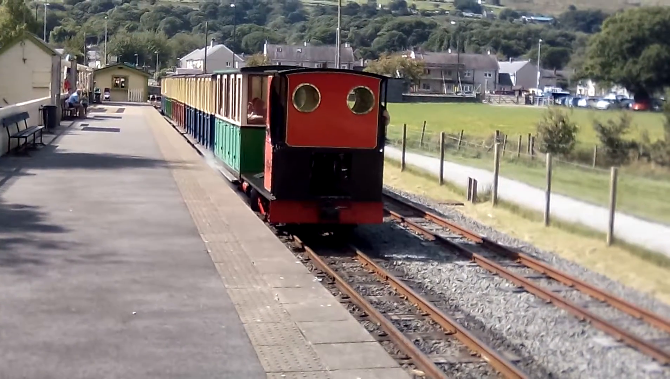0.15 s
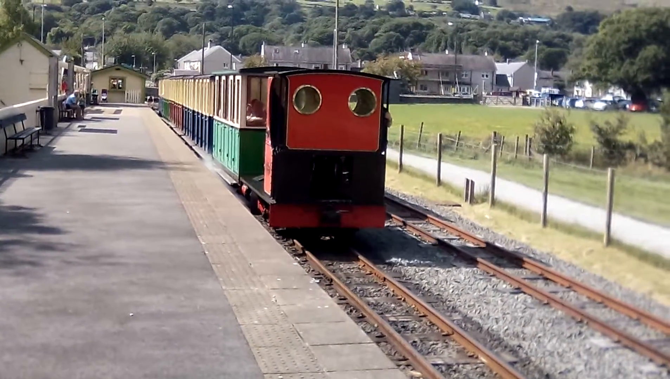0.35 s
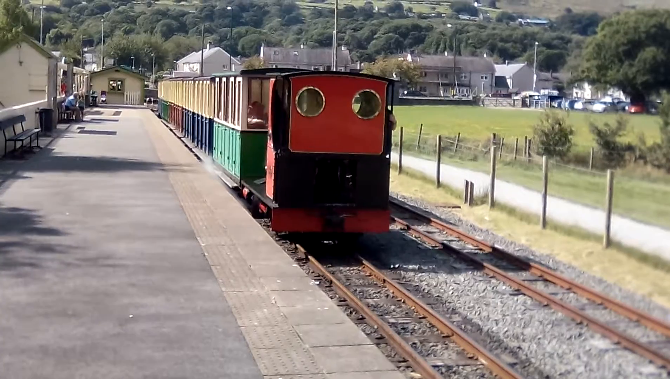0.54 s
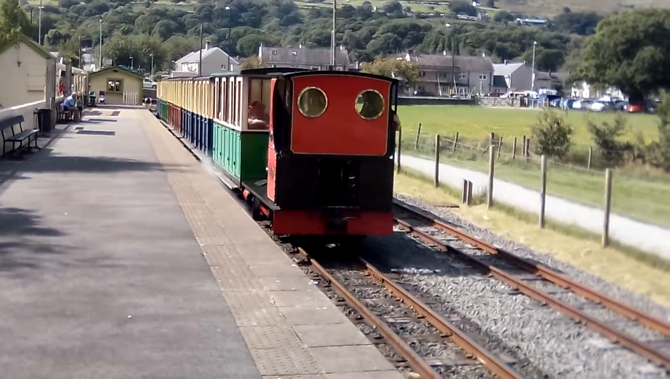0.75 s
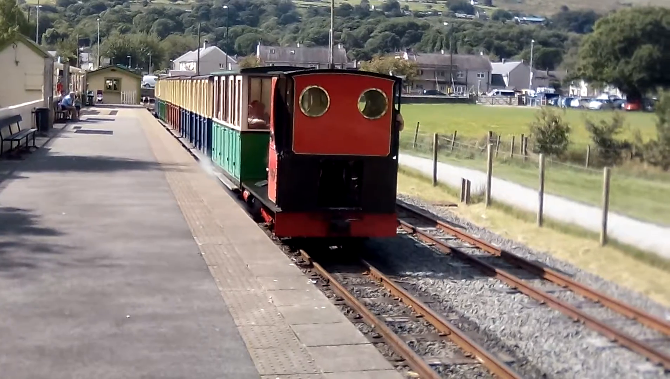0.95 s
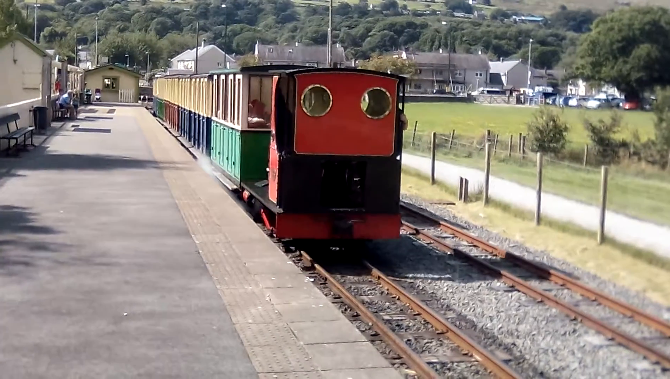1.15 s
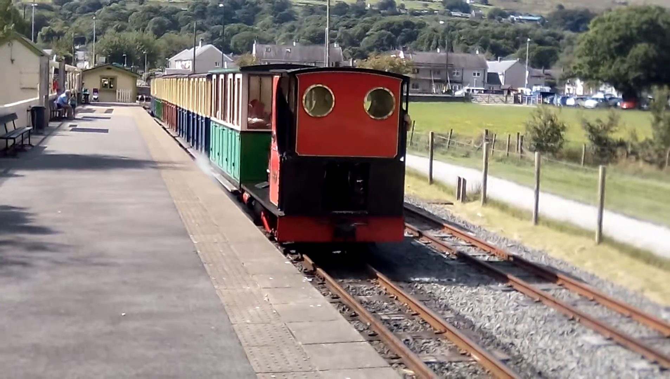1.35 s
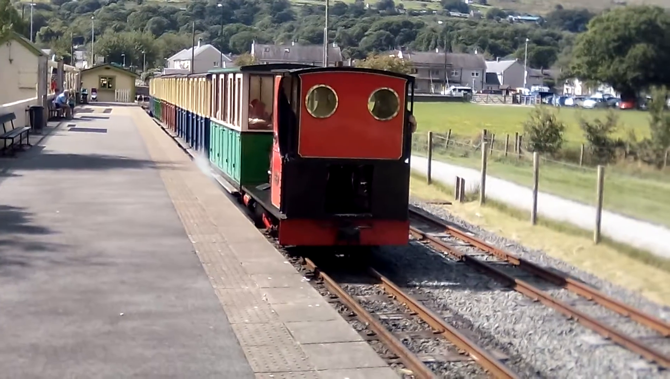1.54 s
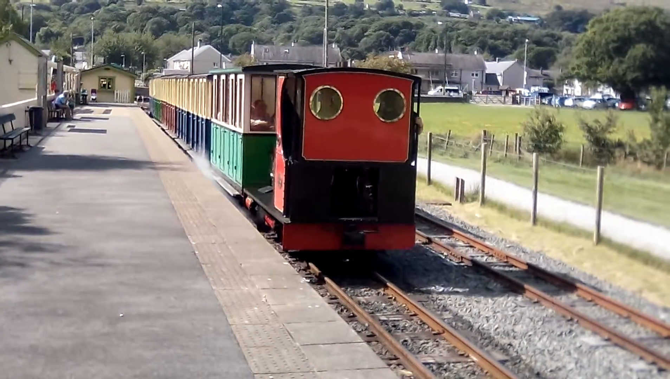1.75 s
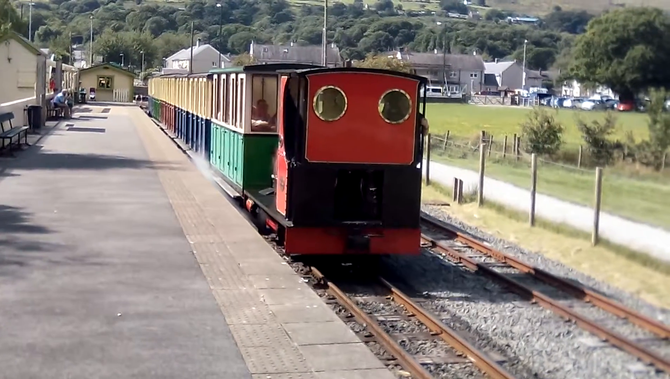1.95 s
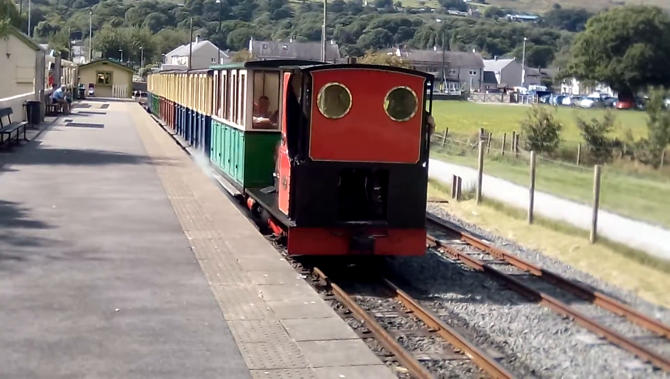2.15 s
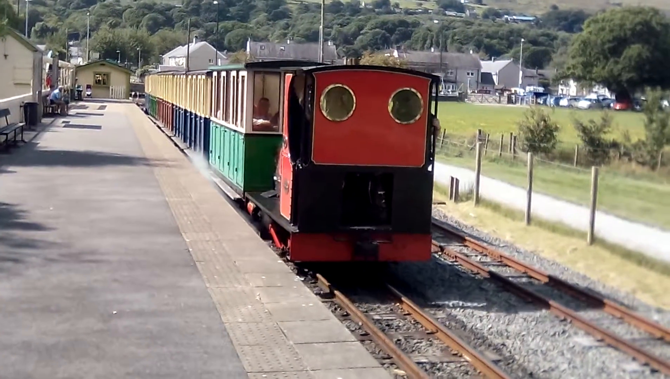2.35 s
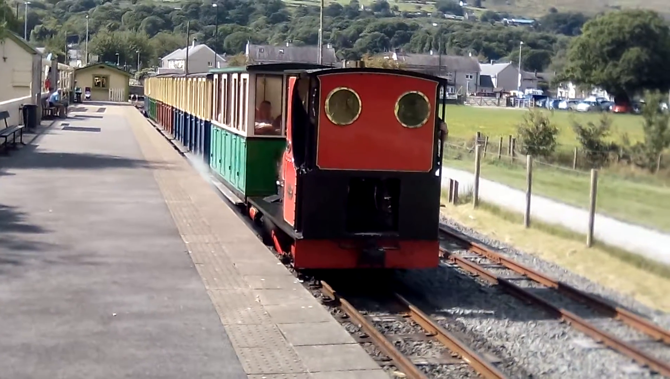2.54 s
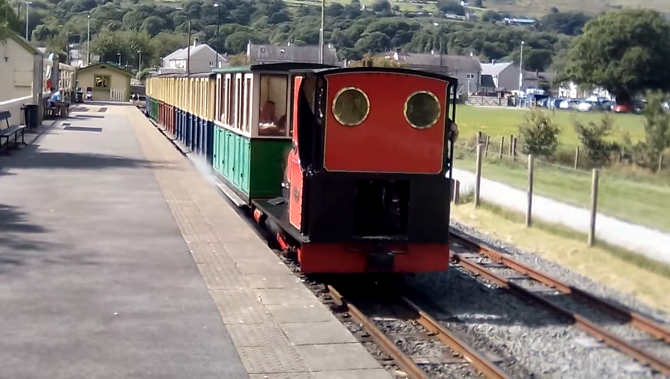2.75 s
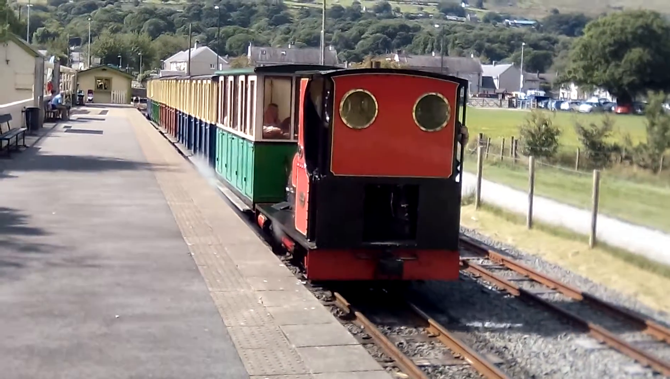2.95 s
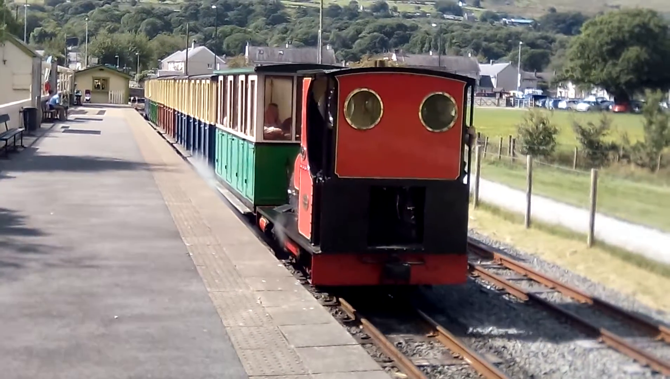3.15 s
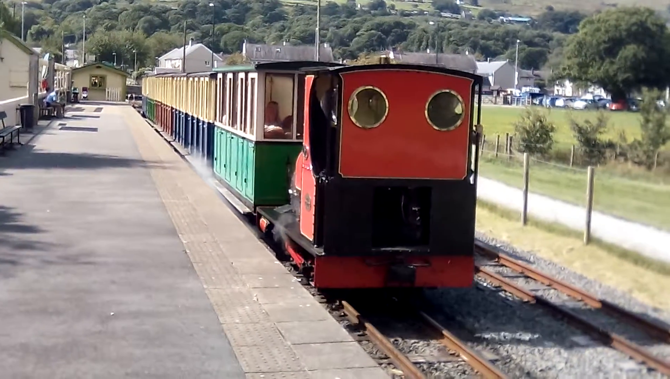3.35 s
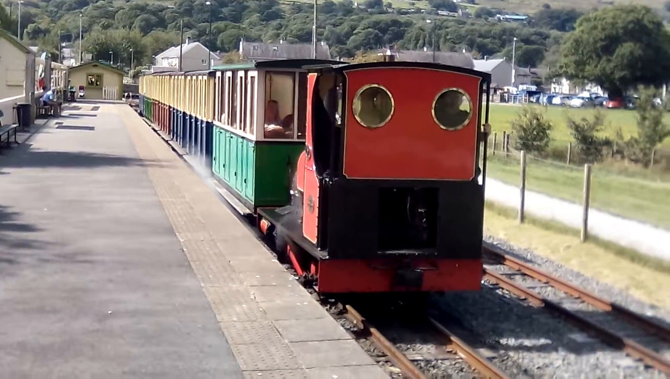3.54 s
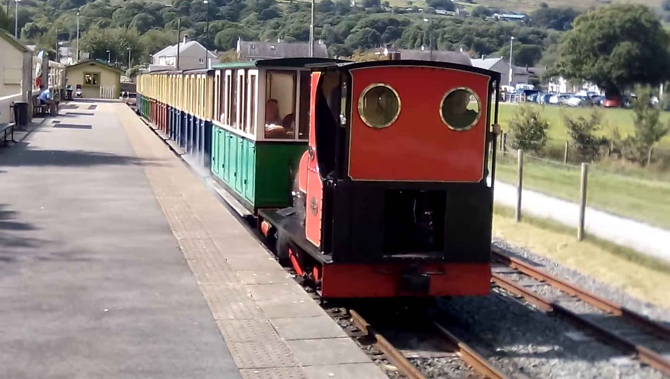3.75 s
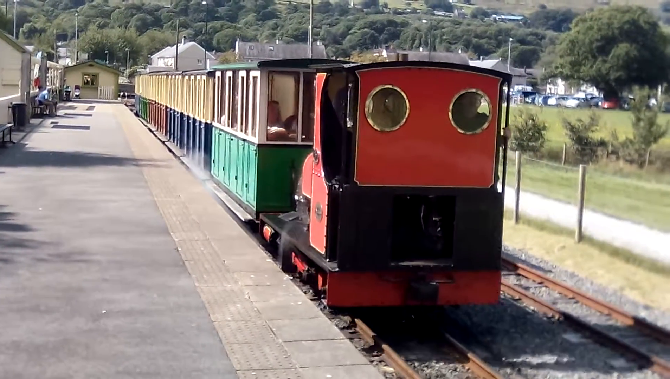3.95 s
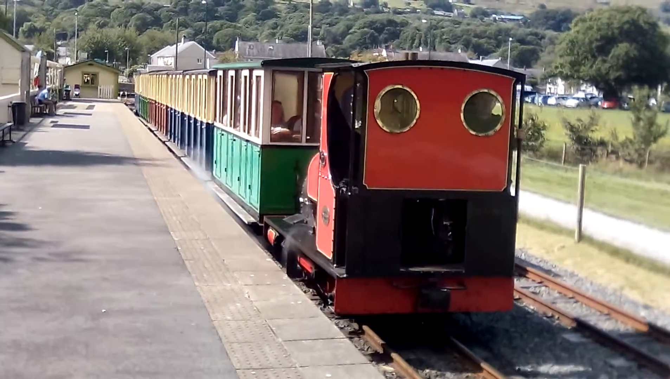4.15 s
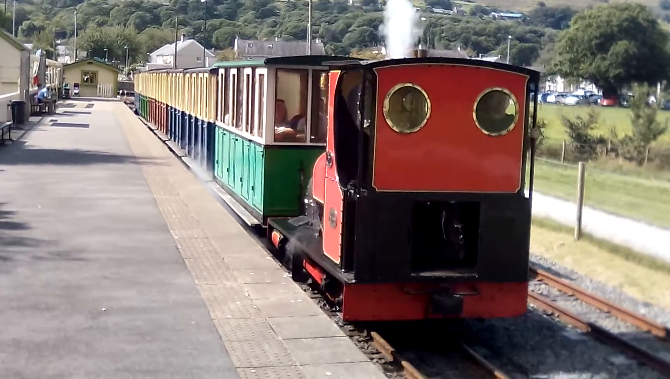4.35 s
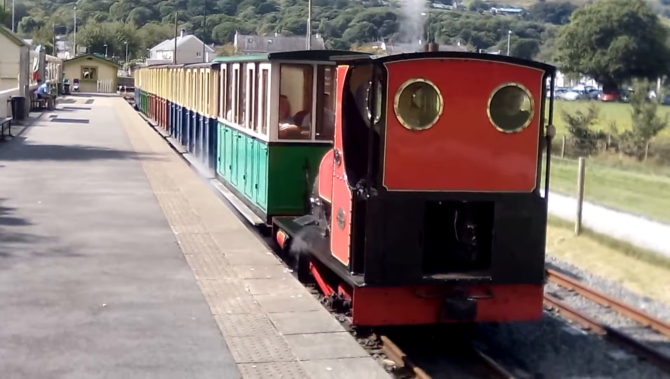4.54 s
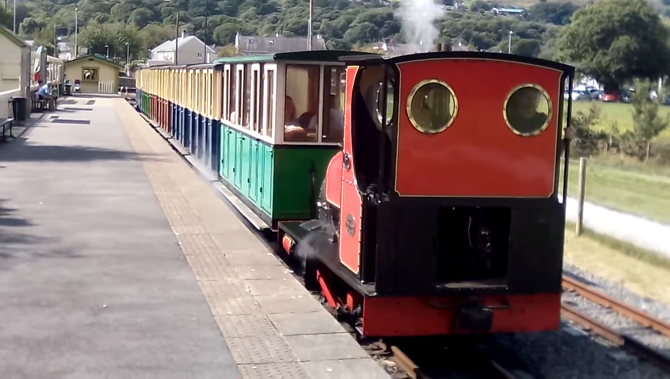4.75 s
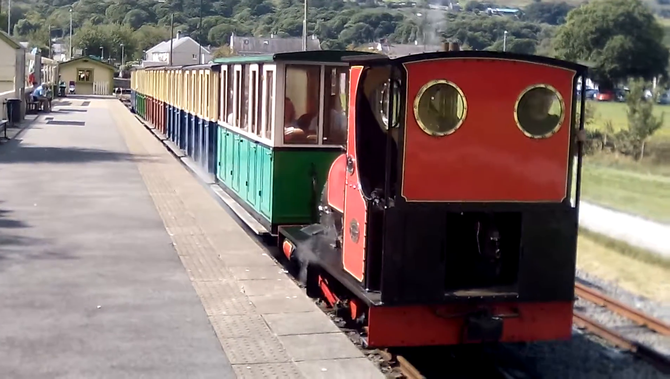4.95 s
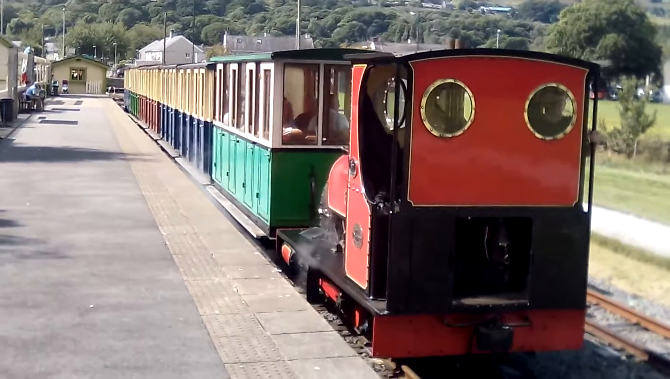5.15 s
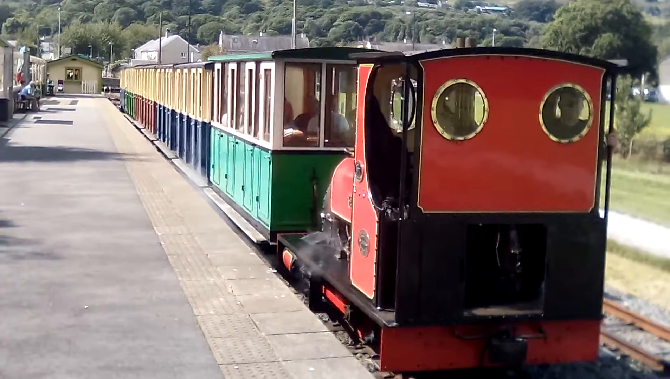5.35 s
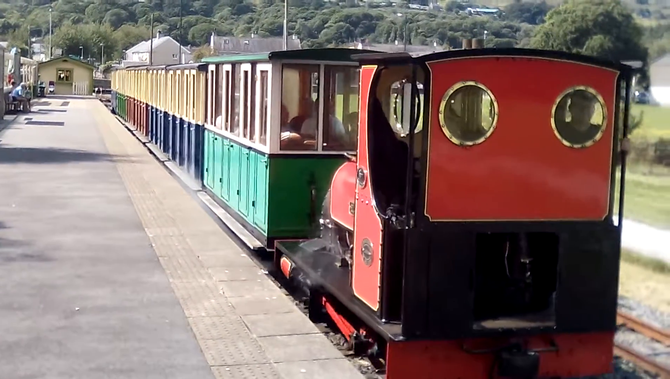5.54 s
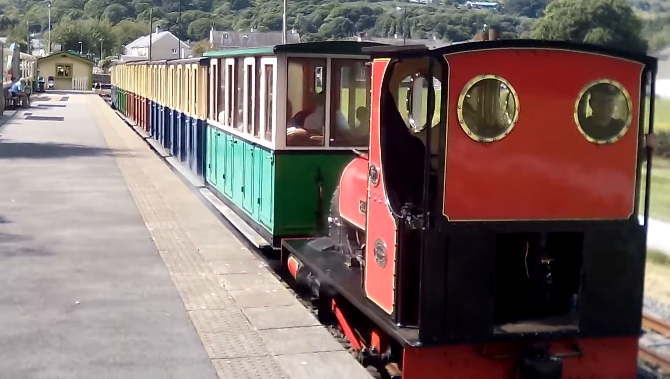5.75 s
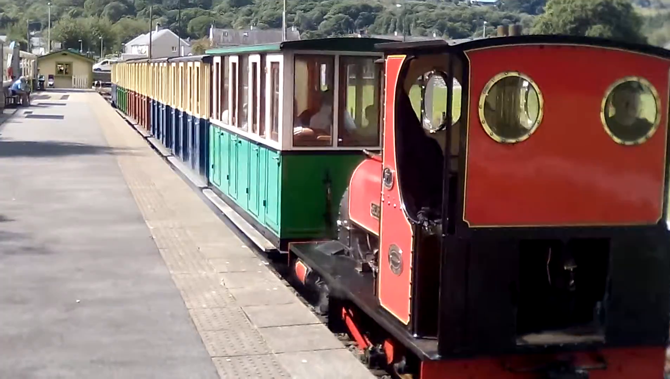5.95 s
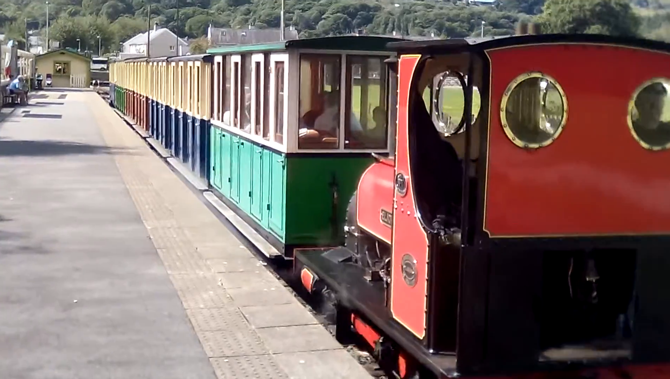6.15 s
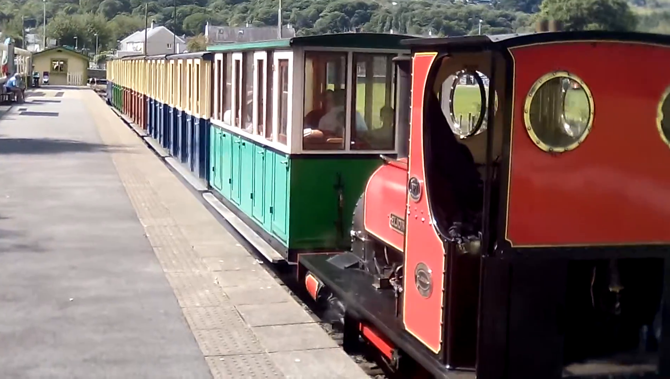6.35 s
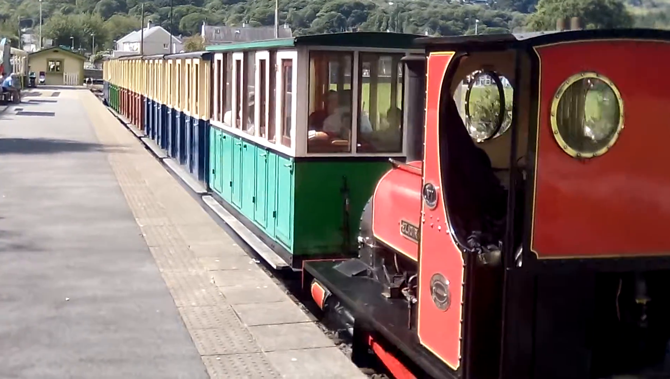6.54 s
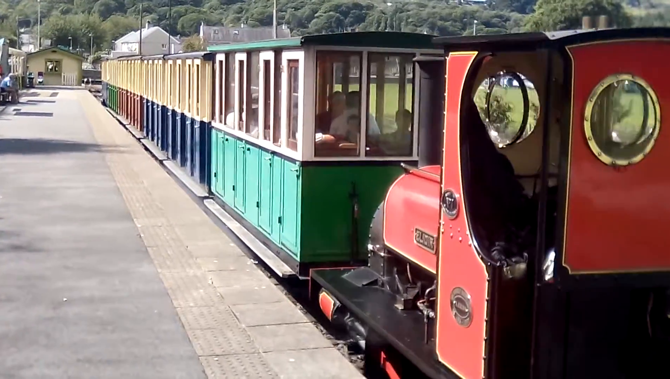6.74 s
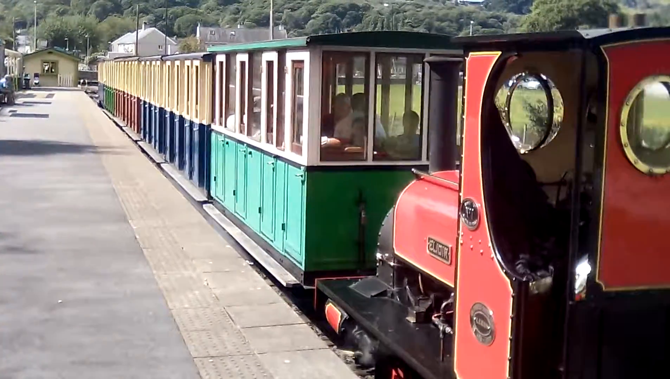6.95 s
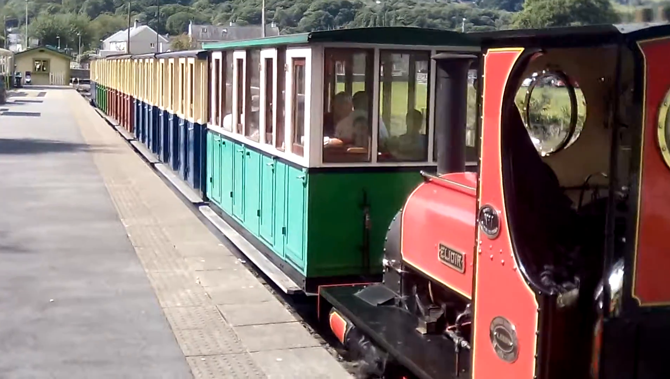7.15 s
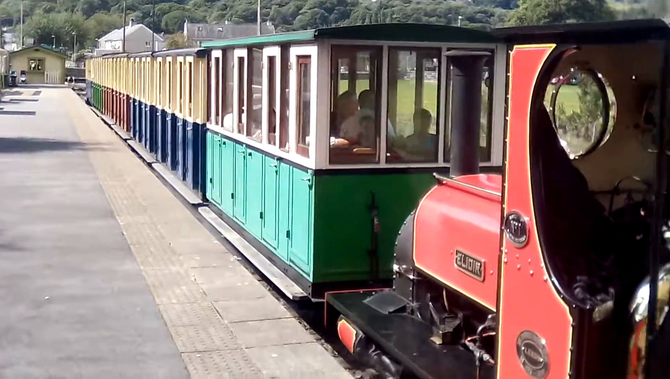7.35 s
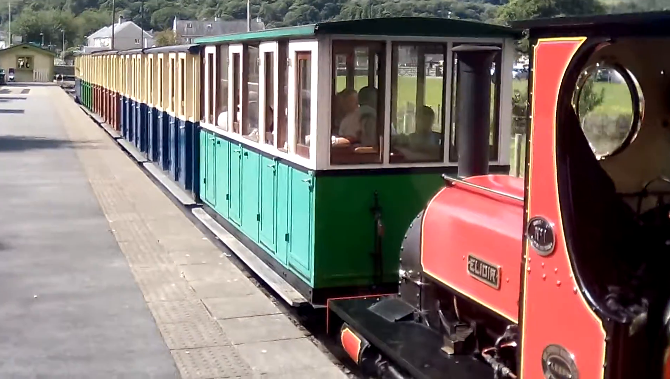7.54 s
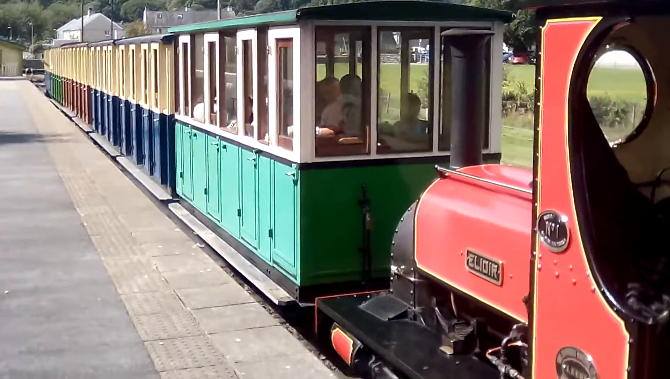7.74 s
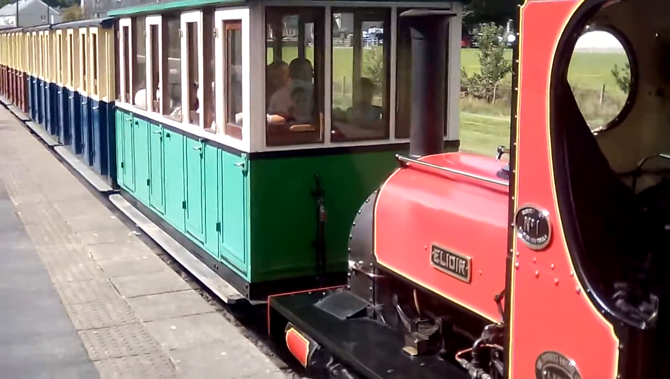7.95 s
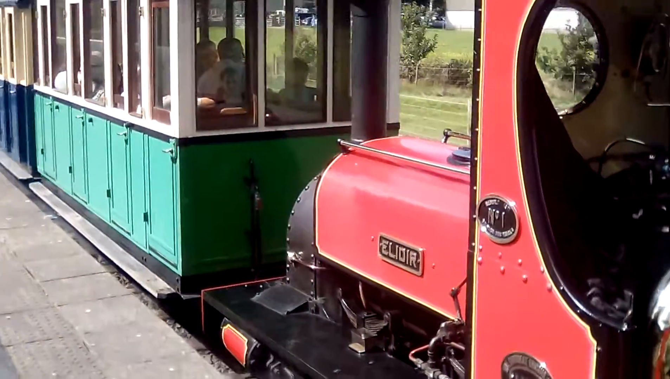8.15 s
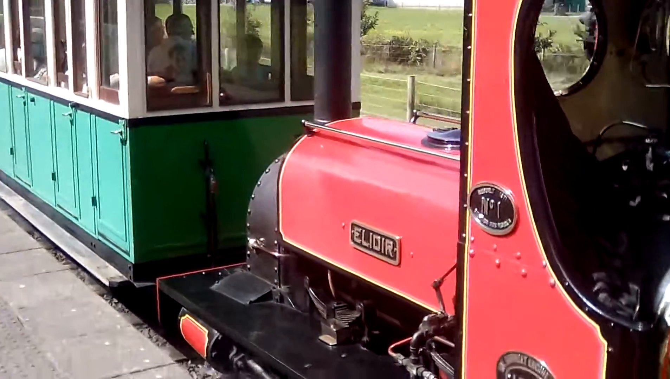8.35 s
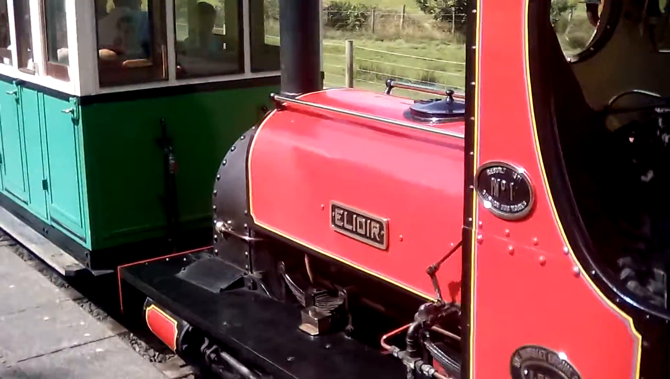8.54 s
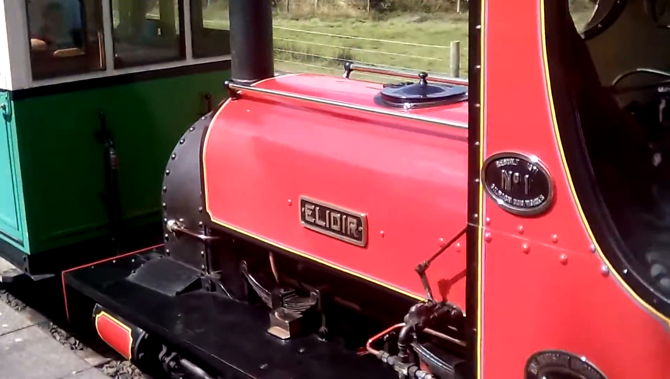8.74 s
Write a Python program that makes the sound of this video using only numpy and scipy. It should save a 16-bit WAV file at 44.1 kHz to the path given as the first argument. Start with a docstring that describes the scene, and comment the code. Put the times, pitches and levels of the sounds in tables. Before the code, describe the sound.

Steam hisses ever louder over gentle, steady puffing as a little engine nears, with two short echoing whistle toots midway.

```python
"""Small steam locomotive approaching

The engine rolls slowly towards an open platform. Jets of leaking steam hiss ever louder, and each
exhaust beat puffs through the chimney pipe and rings its modes. The whistle, a stopped pipe, toots
twice and echoes over the valley, while a light wind buffets the single microphone."""
import sys
import numpy as np
from scipy import signal
from scipy.fft import rfft, irfft, next_fast_len
from scipy.io import wavfile

SR = 44100
rng = np.random.default_rng(int(sys.argv[2]) if len(sys.argv) > 2 else 0)


def inscribe(sig):
    """Save sig as 16-bit PCM at rate SR to the path in sys.argv[1].

    A 1-D sig is mono; a 2-D sig holds one channel per row.
    Samples are clipped to [-1, 1] before scaling.
    """
    pcm = np.round(np.clip(np.atleast_2d(sig).T, -1, 1) * 32767)
    wavfile.write(sys.argv[1], SR, pcm.astype(np.int16))


N = 387638

# The hiss building as the engine nears: time_s, level_db, top_boost_db, roar_boost_db
HISS_RISE = [(0.0, -50, -1, 1), (1.44, -48, -1.5, 0.5), (2.35, -48, -1, 1.5), (4.11, -45, 0.5, 1),
             (4.5, -43.5, -0.5, 1), (5.02, -43, -1, 1), (7.07, -38.5, -0.5, 0), (7.59, -36.5, -1.5, 0),
             (8.79, -34, -1.5, 0.5)]
# Tone colour of the steam jets: frequency_hz, relative_density_db
HISS_SPECTRUM = [(350, -28), (600, -16), (716, -21.5), (1010, -17), (1450, -17.5), (1810, -12.5),
                 (1990, -17), (2190, -13), (3290, -8), (4200, -4.5), (6400, 0.5), (8180, -10), (9370, -8),
                 (13500, -16.5), (15500, -20.5)]
# Bands that stand out in the hiss and give it a hollow, ringing colour: pitch_hz, width_hz, relative_db
HISS_PEAKS = [(1772, 71, -10.5), (2150, 160, -6.5), (4250, 154, -2), (4820, 200, -23), (5850, 240, -16),
              (6470, 160, 5.5), (9250, 260, -5)]


def steam_leaks(flicker_db, shared_flicker_db, peaks_db):
    """Jet noise in half-octave bands that flicker partly together, with a few hollow-sounding peaks."""
    hiss_db, top_db, roar_db = envelopes(HISS_RISE)
    edges_hz = 500 * 2 ** np.arange(0, 5.1, .5)
    shared_db = shared_flicker_db * drift(12.0)
    hiss = np.zeros(N)
    for low, high in zip(edges_hz, edges_hz[1:]):
        tilt_db = top_db if low > 7500 else roar_db if high < 3000 else 0
        band = shaped_noise(HISS_SPECTRUM, low, high)
        hiss += band * from_db(tilt_db + shared_db + flicker_db * drift(19.0))
    lift_db = peaks_db + 0.35 * (hiss_db - hiss_db[-1])   # the peaks stand out more as the engine nears
    for hz, width, db in HISS_PEAKS:
        peak = [(hz, width, 0)]
        gain = from_db(db + lift_db + 1.9 * drift(5.1) + 1.3 * drift(.7))
        hiss += gain * resonate(resonate(rng.standard_normal(N), peak), peak)
    return from_db(hiss_db) * rms_one(hiss)


# Reflections off the frame and platform edge: delay_ms, far_gain, near_gain
BOUNCES = [(1.0, -0.00094, .1), (1.9, 0.024, -0.061), (2.6, -0.095, 0.073)]


def close_bounces(hiss, scatter_gain):
    """Dull reflections comb the hiss and change as the engine nears; others waver at random delays."""
    nearness, out = np.arange(N) / N, hiss.copy()
    dull = signal.sosfiltfilt(signal.butter(2, 7500, fs=SR, output="sos"), hiss)
    for ms, far_gain, near_gain in BOUNCES:
        lag = round(ms * SR / 1000)
        gain = far_gain + (near_gain - far_gain) * nearness
        out[lag:] += gain[lag:] * dull[:-lag]
    for lag in (rng.uniform(.0008, .007, size=16) * SR).astype(int):
        out[lag:] += scatter_gain * drift(2.55)[lag:] * hiss[:-lag]
    return out * np.std(hiss) / np.std(out)


# Exhaust beats: start_s, peak_db, second_mode_boost_db, upper_modes_boost_db, hum_db
EXHAUST_BEATS = [(0.195, -49.5, -2, -1, -58.5), (0.467, -56, -5, -1, -50), (0.806, -49, -17, -5, -53.5),
                 (1.086, -53, -6, -10, -60), (1.18, -52.5, -3, -3, -50.5), (1.461, -53.5, 3, 4, -52),
                 (1.732, -57.5, 3, 0, -60.5), (2.047, -52, -9, -2, -50), (2.383, -52.5, 8, -15, -54),
                 (2.67, -51, 2, 2, -57), (2.77, -52.5, -13, 5.5, -59), (2.91, -50.5, -3, -3, -59.5),
                 (3.21, -52, 3.5, -4, -60), (3.519, -48, 1.5, -3, -57.5), (3.81, -47, 5, -3.5, -54.5),
                 (4.06, -54, -1.5, -7, -57), (4.33, -50, 3, 0, -63.5), (4.66, -49.5, -0.5, -8, -77),
                 (4.908, -45, 7, 0, -72), (5.139, -50.5, 4.5, 2.5, -64), (5.424, -45.5, 0, -6.5, -70.5),
                 (5.714, -48.5, 9.5, 1.5, -57.5), (5.978, -45, 2, -3, -61.5), (6.196, -48, 2, -2, -59.5),
                 (6.458, -45, -4, -8, -58), (6.75, -43, 6, -6, -53.5), (6.997, -46, 7.5, 2, -51.5),
                 (7.21, -46, 3.5, -4.5, -53), (7.468, -41.5, 4, -1, -57), (7.751, -39.5, 3, -3, -47.5),
                 (7.992, -37.5, 2.5, -0.5, -47), (8.192, -45, 4.5, -1, -49), (8.447, -39, 5, -3, -42.5),
                 (8.722, -40.5, 4, 0, -43.5)]
# The chimney's body, second mode and upper ring: pitch_hz, width_hz, relative_db
CHIMNEY_BODY = [(186, 53, -1), (465, 74, -6), (551.3, 40, 2), (650, 53, -7.5)]
CHIMNEY_SECOND = [(394.6, 28, 3.3)]
CHIMNEY_UPPER = [(754, 81, -9), (995, 66, -7.5), (1270, 120, -13), (2010, 830, -24)]


def chimney(attack_s, hold_s, tail_s, crest_db, hum_hz, hum_wander_hz, hum_peak_s):
    """Each beat puffs noise into the pipe modes and sets the lowest humming; the draught whispers on."""
    t, puffs, hum_swell = np.arange(N) / SR, np.zeros((3, N)), np.zeros(N)
    for start_s, db, second_db, upper_db, hum_db in EXHAUST_BEATS:
        span = slice(int(start_s * SR) + 1, int((start_s + .5) * SR))
        age = t[span] - start_s
        shape = np.minimum(age / attack_s, 1) * np.exp(-np.maximum(age - hold_s, 0) / tail_s)
        puffs[:, span] += from_db(db - crest_db + np.array([[0], [second_db], [upper_db]])) * shape
        hum_swell[span] += from_db(hum_db) * age / hum_peak_s * np.exp(1 - age / hum_peak_s)
    hiss_db = envelopes(HISS_RISE)[0]
    approach_db = .7 * (hiss_db - hiss_db[-1])
    draught_db = -59.5 + 4.5 * stroke_swells(width_s=0.093) + approach_db + 3.0 * drift(3.5)
    air = rng.standard_normal((3, N))
    pipe_gain = 1 / np.std(resonate(air[0], CHIMNEY_BODY))
    body = resonate(air[0] * np.hypot(puffs[0], from_db(draught_db)), CHIMNEY_BODY)
    second = resonate(air[1] * np.hypot(puffs[1], from_db(draught_db - 7.5)), CHIMNEY_SECOND)
    second = resonate(second, [(415, 39, 0)])   # filtered twice for a clean, narrow ring
    upper = resonate(air[2] * puffs[2], CHIMNEY_UPPER)
    hum_gain = np.sqrt(2) * hum_swell * from_db(2.6 * drift(16.0))
    hum_phase = 2 * np.pi * np.cumsum(hum_hz + hum_wander_hz * drift(9.0)) / SR
    return pipe_gain * (body + second + upper) + hum_gain * np.sin(hum_phase)


def stroke_swells(width_s):
    """A control curve with a smooth swell at every exhaust beat."""
    t = np.arange(0, N, 100) / SR
    swells = sum(np.exp(-((t - beat[0] - width_s / 2) / width_s) ** 2) for beat in EXHAUST_BEATS)
    return np.interp(np.arange(N) / SR, t, swells)


# One curve per toot: time_s, pitch_hz, fundamental_db, second_partial_db, third_partial_db
TOOTS = [
    [(4.392, 753, -48, -80, -75), (4.41, 786, -26.5, -62, -40.5), (4.435, 817, -22.5, -51, -41.5),
     (4.465, 826, -21.5, -63, -34), (4.488, 819.4, -20, -57, -46), (4.51, 816, -20.5, -45, -31.5),
     (4.549, 818.3, -22, -42, -30.5), (4.564, 780, -31, -57, -53.5), (4.585, 730, -50, -73, -65)],
    [(4.712, 784, -45, -80, -77), (4.728, 821, -29.5, -59, -41), (4.75, 815, -24, -44, -31),
     (4.772, 833, -24, -50, -42), (4.8, 830, -24.5, -40.5, -34.5), (4.834, 833, -25, -51, -31.5),
     (4.843, 777, -28.5, -53, -36), (4.865, 755, -36.5, -67, -78), (4.89, 745, -56.5, -78, -72)],
]
# The bright edge of a fully blown toot, before its rasp is added: harmonic_number, level_db
UPPER_PARTIALS = [(4, -46), (5, -47), (6, -50), (7, -41.5)]
# Rasp of breath and upper partials, one per toot, the second harsher: boost_db
TOOT_RASP = [-2, 3.5]


def whistle(wobble_hz, roughness, full_blow_db, build_s):
    """A stopped pipe: strong odd partials, pitch rising and falling with steam pressure, plus breath."""
    out, t = np.zeros(N), np.arange(N) / SR
    breath_modes = [(796, 190, -2.5), (2540, 480, 1), (4960, 2600, -3.0)]
    breath = rms_one(resonate(rng.standard_normal(N), breath_modes))
    wobble, turbulence = drift(47.0), drift(120.0)
    for toot, rasp_db in zip(TOOTS, TOOT_RASP):
        hz, fundamental_db, second_db, third_db = envelopes(toot)
        start_s, end_s = toot[0][0], toot[-1][0]
        blow_db = np.minimum(fundamental_db - full_blow_db, 0)
        # The upper partials start weak and fall away fast when the blow is soft.
        onset_db = -20 * np.exp(-np.maximum(t - start_s, 0) / build_s)
        upper = [(k, db + 2.2 * blow_db + onset_db + rasp_db) for k, db in UPPER_PARTIALS]
        phase = 2 * np.pi * np.cumsum(hz + wobble_hz * wobble) / SR
        tone = from_db(fundamental_db) * np.sin(phase)
        for k, db in [(2, second_db), (3, third_db)] + upper:
            shake = 1 + roughness * np.roll(turbulence, 999 * k)   # the jet shakes each one separately
            tone += from_db(db) * shake * np.sin(k * phase)
        breath_gain = from_db(-43.5 + rasp_db + 1.5 * blow_db)
        valve_open = (t > start_s) & (t < end_s)
        out += valve_open * (np.sqrt(2) * tone + breath_gain * breath)
    return out


def valve_spit(start_s, end_s, level_db, fade_s):
    """Wet steam spits from the whistle valve in one short, bright burst."""
    t = np.arange(N) / SR
    spray = filtered(rng.standard_normal(N), 2, [7800, 13500], "band")
    gate = np.clip(np.minimum(t - start_s, end_s - t) / fade_s, 0, 1)
    return from_db(level_db) * gate * rms_one(spray)


# Echoes off walls and slopes: delay_s, gain_db
VALLEY_ECHOES = [(.025, -12.5), (.06, -18.5), (.1, -19), (.15, -22.5), (.25, -26), (.55, -42), (.75, -50.5)]


def valley(sound, scatter_db, t60_s):
    """Dull echoes and a long scatter from the hills; one small hard face returns only the overtones."""
    t = np.arange(2 * SR) / SR
    decay = from_db(scatter_db - 60 * t / t60_s)
    response = decay * rng.standard_normal(len(t)) * np.sqrt(14 / t60_s / SR)
    for delay_s, db in VALLEY_ECHOES:
        response[int(delay_s * SR)] += from_db(db)
    dull = filtered(sound, 1, 5000, "low")
    thin_slap = from_db(-15) * np.roll(filtered(sound, 2, 1800, "high"), int(0.095 * SR))
    return signal.fftconvolve(dull, response)[:N] + thin_slap


# Gusts and lulls: time_s, level_db
GUSTS = [(0.0, -51.5), (0.41, -60.5), (0.66, -52), (1.44, -63), (1.86, -57.5), (2.74, -59), (2.89, -55),
         (3.82, -56.5), (4.09, -51), (4.48, -55), (5.65, -54.5), (5.8, -48), (6.14, -58), (6.88, -54.5),
         (7.07, -51.5), (7.3, -51.5), (7.78, -57), (8.79, -55)]
# Tone colour of wind on the microphone: frequency_hz, relative_density_db
RUMBLE_SPECTRUM = [(12, -43), (20, -39), (70, 2.5), (97, 1.5), (189, -8), (251, -18.5), (323, -21.5),
                   (552, -23.5), (631, -48), (700, -19), (910, -54), (1540, -120)]
# The strongest wind thumps: centre_s, peak_db, pitch_hz
BUFFETS = [(0.186, -38, 102), (0.448, -39, 104), (0.688, -38, 117), (1.231, -35, 109), (1.312, -37, 151),
           (1.683, -34.5, 133), (1.962, -28.5, 156), (2.514, -36, 100), (2.757, -34.5, 126),
           (2.789, -34.5, 124), (2.82, -38, 111), (2.841, -42, 159), (3.164, -39.5, 142), (3.4, -38.5, 113),
           (3.881, -41, 120), (3.927, -33.5, 116), (3.968, -40.5, 107), (4.071, -38.5, 119),
           (4.151, -44, 110), (4.173, -36, 114), (4.218, -39, 119), (4.693, -37, 173), (4.95, -39, 104),
           (5.305, -43, 119), (5.375, -40, 195), (5.7, -35, 100), (5.892, -38.5, 107), (5.939, -41, 115),
           (6.223, -41, 115), (6.33, -35, 106), (6.601, -40, 97), (6.887, -38.3, 119), (7.169, -28, 112),
           (7.222, -39, 109), (7.272, -35.5, 108)]


def wind(lumpiness_db, floor_db, small_buffets, half_width_cycles):
    """Lumpy rumble over a smooth deep floor, and single pressure kicks of about one swing each."""
    wind_db, = envelopes(GUSTS)
    lumps = from_db(wind_db + lumpiness_db * drift(23.0) + 1.6 * drift(2.7))
    rumble = from_db(floor_db) * rms_one(shaped_noise(RUMBLE_SPECTRUM, 10, 55))
    rumble += lumps * rms_one(shaped_noise(RUMBLE_SPECTRUM, 55, 700))
    when = rng.choice(N, small_buffets, p=lumps / lumps.sum())   # weaker kicks favour the gusts
    size, pitch = rng.standard_normal((2, small_buffets))
    small = zip(when / SR, wind_db[when] + 10.5 + 3 * size, 105 * np.exp(.15 * pitch))
    for centre_s, db, hz in list(small) + BUFFETS:
        span = np.arange(max(int((centre_s - 3 / hz) * SR), 0), min(int((centre_s + 3 / hz) * SR), N))
        cycles, phase = (span / SR - centre_s) * hz, rng.uniform(0, 2 * np.pi)
        kick = np.sin(2 * np.pi * cycles + phase) + 0.18 * np.sin(4 * np.pi * cycles + phase)
        rumble[span] += from_db(db) * kick * np.exp(-(cycles / half_width_cycles) ** 2)
    return rumble


def from_db(db):
    """Gain of a level in dB."""
    return 10 ** (np.asarray(db) / 20)


def rms_one(x):
    """The signal scaled to rms 1."""
    return x / np.sqrt(np.mean(x ** 2) + 1e-20)


def envelopes(rows):
    """One full-length curve for each column after time_s."""
    time_s, *columns = np.transpose(rows)
    return [np.interp(np.arange(N) / SR, time_s, column) for column in columns]


def drift(rate_hz):
    """Smooth random wander of rms 1, mostly slower than rate_hz."""
    pole = np.exp(-80 * np.pi * rate_hz / SR)   # runs at one step per 40 samples
    slow = signal.lfilter([1], [1, -2 * pole, pole * pole], rng.standard_normal(N // 40 + 2002))[2000:]
    return np.interp(np.arange(N) / 40, np.arange(len(slow)), rms_one(slow))


def filtered(x, order, edge_hz, kind):
    """A Butterworth low, high or band pass."""
    return signal.sosfilt(signal.butter(order, edge_hz, kind, fs=SR, output="sos"), x)


def resonate(x, bands):
    """Parallel two-pole band passes (pitch_hz, width_hz, gain_db), summed with alternating signs."""
    out = np.zeros(N)
    for k, (hz, width, db) in enumerate(bands):
        r = np.exp(-np.pi * width / SR)
        b = (1 - r * r) / 2 * np.array([1, 0, -1])
        a = [1, -2 * r * np.cos(2 * np.pi * hz / SR), r * r]
        out += (-1) ** k * from_db(db) * signal.lfilter(b, a, x)
    return out


def shaped_noise(spectrum, low_hz, high_hz):
    """Noise with the given tone colour between two band edges."""
    size = next_fast_len(N)
    hz = np.maximum(np.arange(size // 2 + 1) * SR / size, 1)
    points_hz, points_db = np.transpose(spectrum)
    gain = from_db(np.interp(np.log(hz), np.log(points_hz), points_db))
    in_band = (hz >= low_hz) & (hz < high_hz)
    return irfft(rfft(rng.standard_normal(size)) * gain * in_band, size)[:N]


def scene():
    """All sources meet in one microphone, copied to both channels."""
    toots = whistle(wobble_hz=1.5, roughness=0.19, full_blow_db=-23, build_s=.045)
    toots += valve_spit(start_s=4.455, end_s=4.5, level_db=-39.5, fade_s=0.0032)
    steam = steam_leaks(flicker_db=0.51, shared_flicker_db=0.5, peaks_db=-2.0)
    steam = close_bounces(steam, scatter_gain=.085)
    steam *= from_db(1.26 * stroke_swells(width_s=0.06))   # the leaks swell with each stroke
    chuffs = chimney(attack_s=0.0062, hold_s=0.036, tail_s=0.019, crest_db=6.0,
                     hum_hz=189.4, hum_wander_hz=3.92, hum_peak_s=0.045)
    echoes = valley(toots, scatter_db=-26.5, t60_s=4.2)
    breeze = wind(lumpiness_db=2.0, floor_db=-65, small_buffets=60, half_width_cycles=0.6)
    mono = steam + chuffs + toots + echoes + breeze
    return np.array([mono, mono])


def record(dry):
    """A steep low-pass cuts the very top of the treble."""
    cutoff_hz = 15470
    return signal.sosfilt(signal.ellip(14, .5, 70, cutoff_hz, fs=SR, output="sos"), dry)


dry = scene()
out = record(dry)
inscribe(out)
```